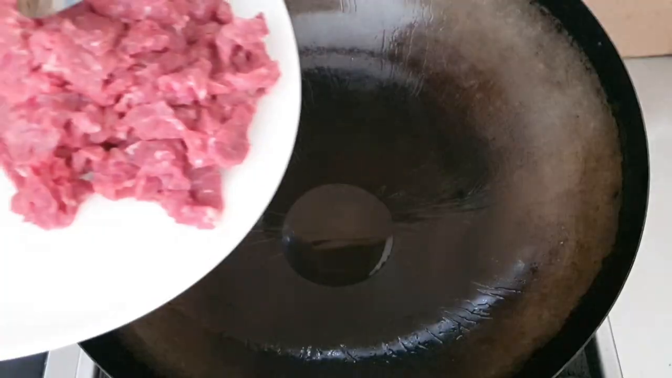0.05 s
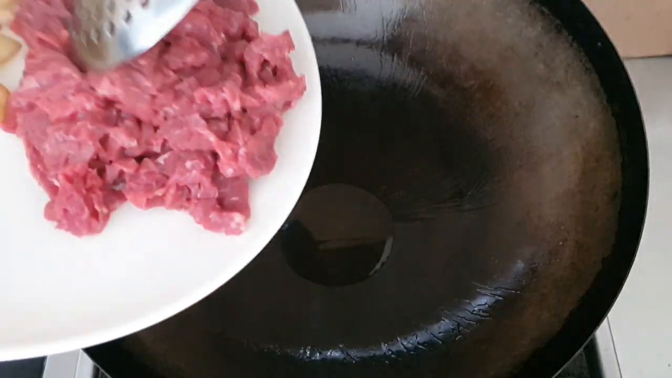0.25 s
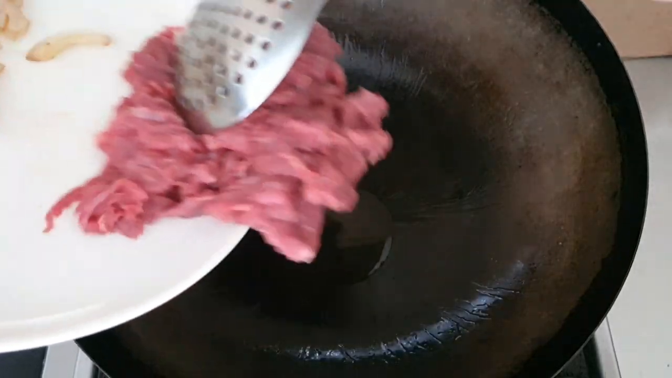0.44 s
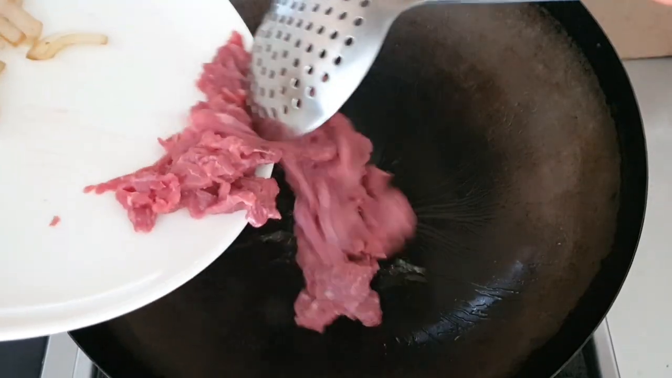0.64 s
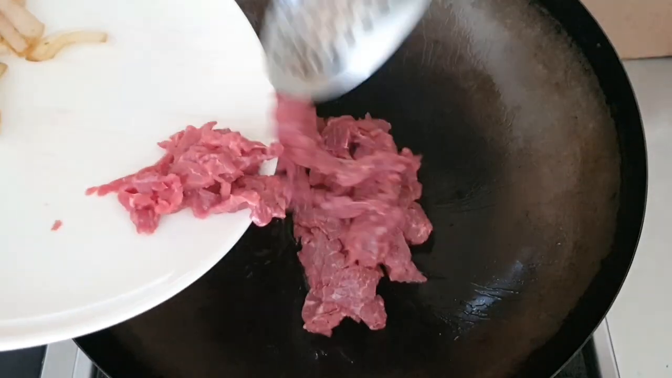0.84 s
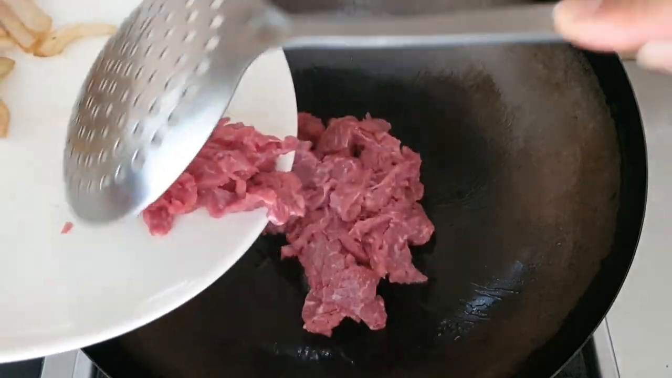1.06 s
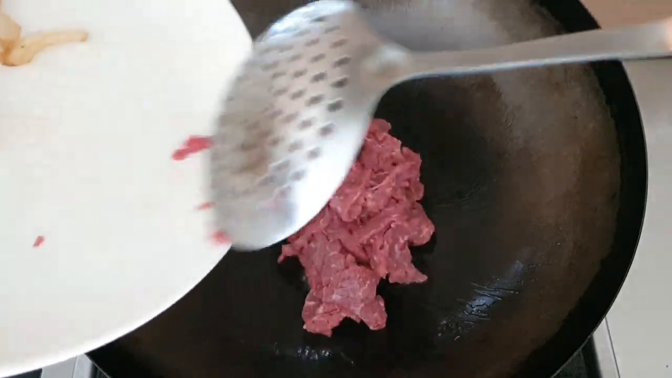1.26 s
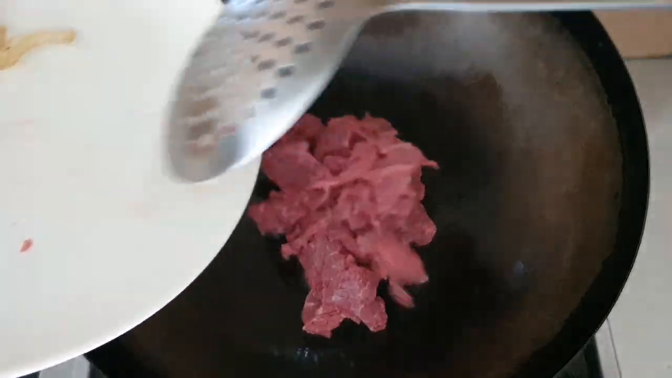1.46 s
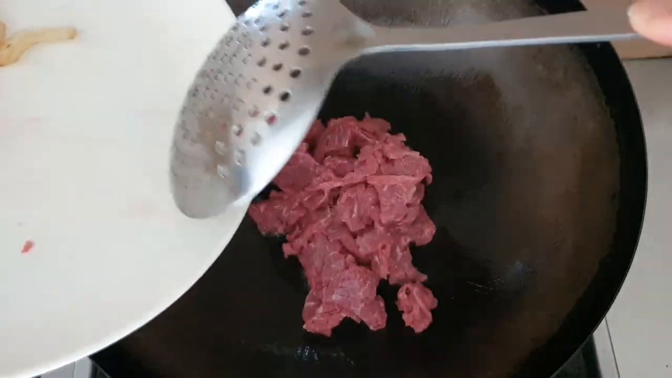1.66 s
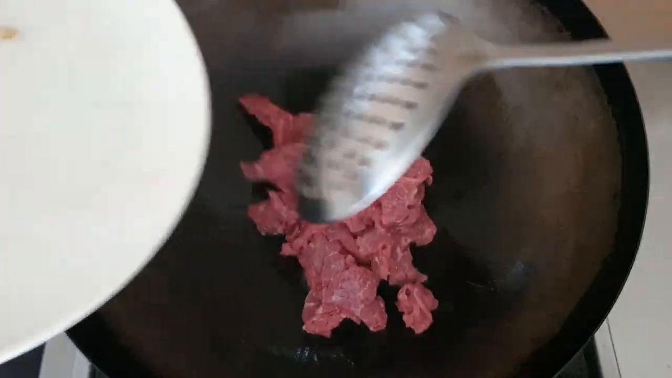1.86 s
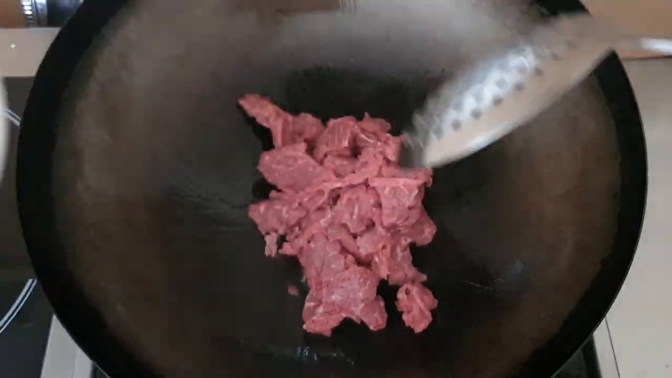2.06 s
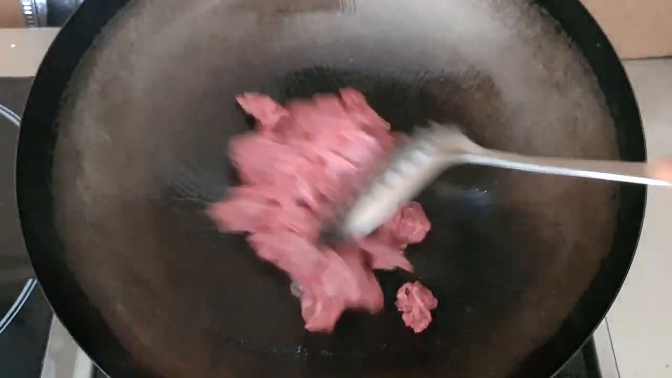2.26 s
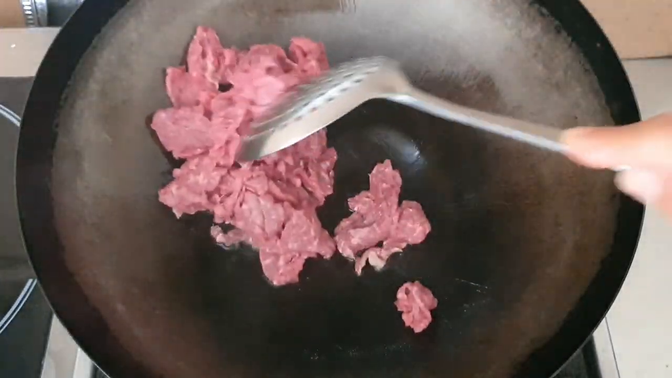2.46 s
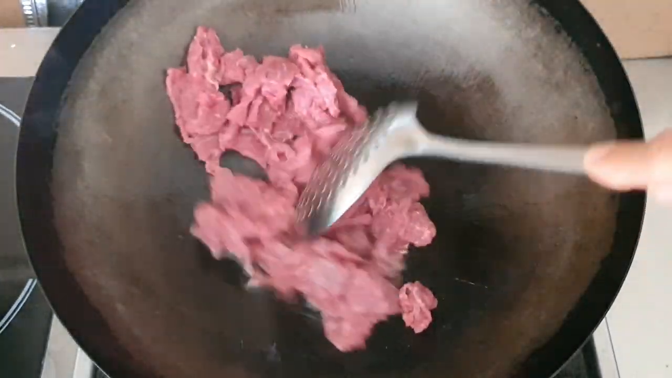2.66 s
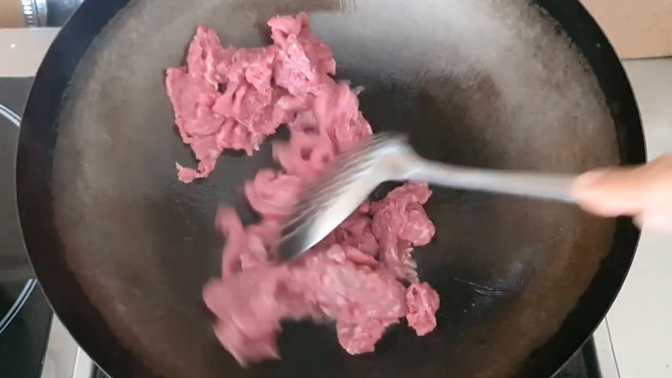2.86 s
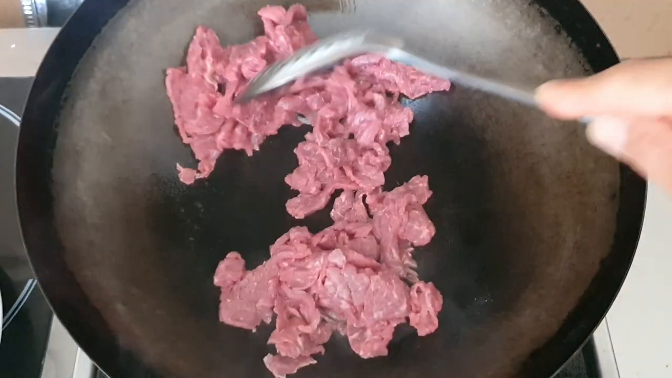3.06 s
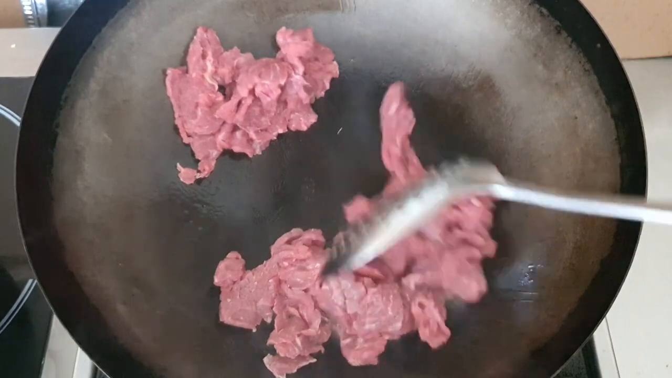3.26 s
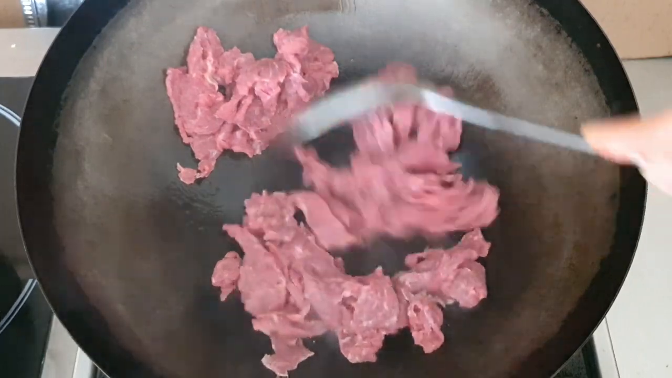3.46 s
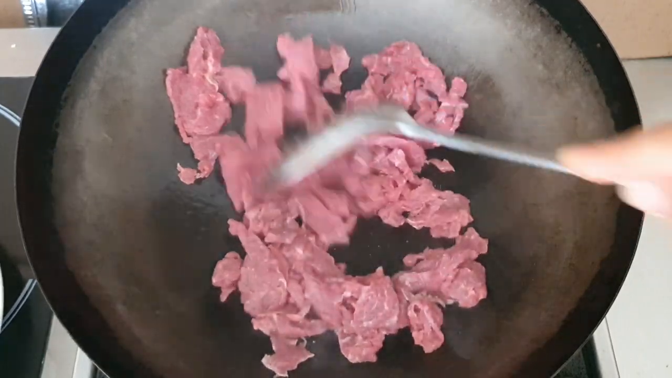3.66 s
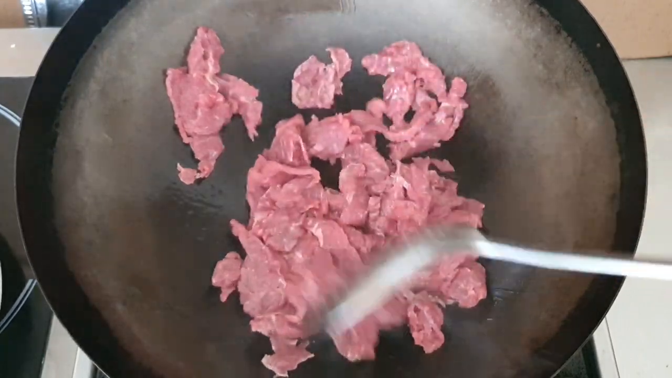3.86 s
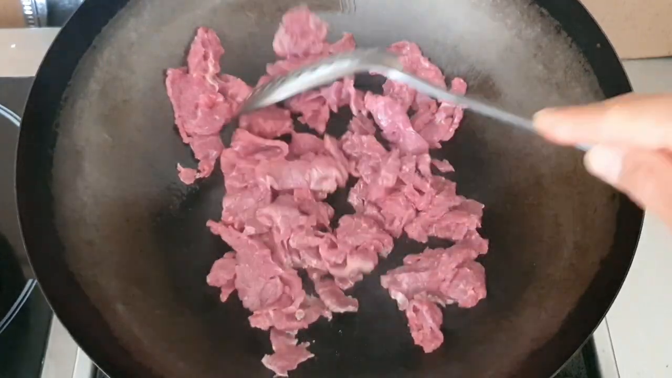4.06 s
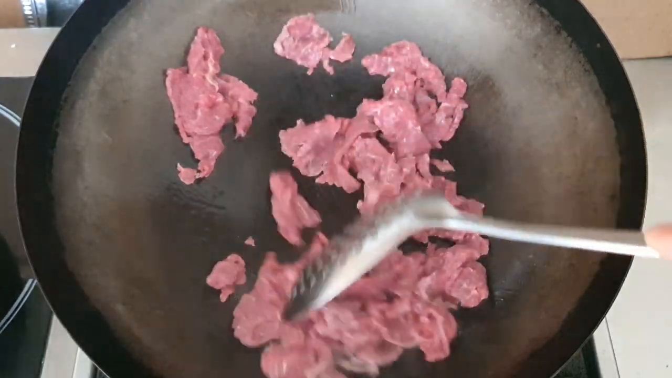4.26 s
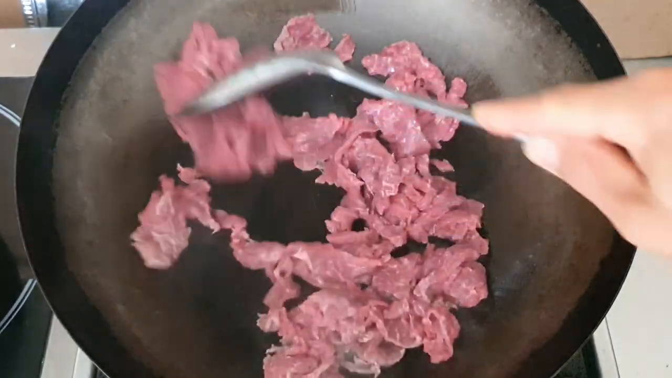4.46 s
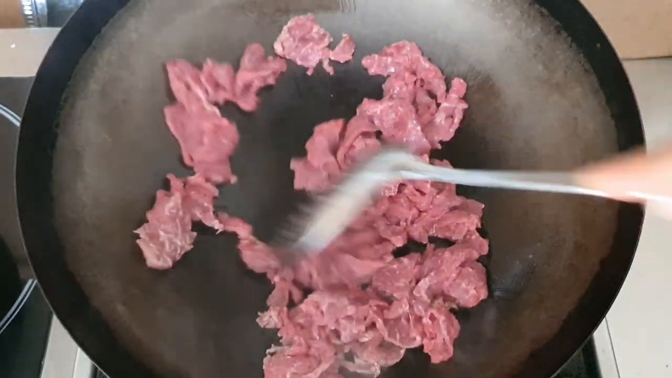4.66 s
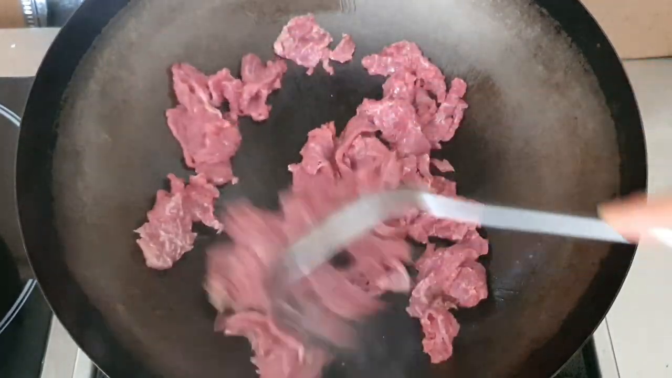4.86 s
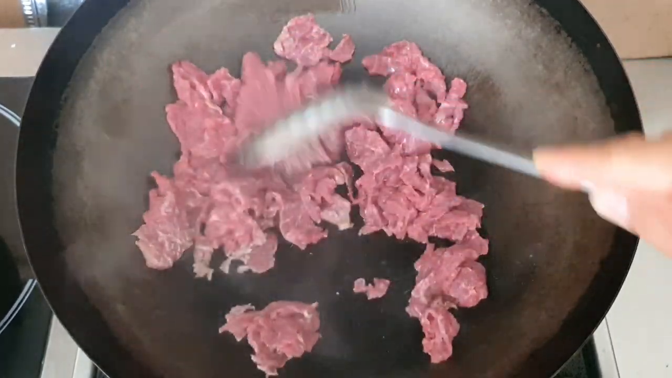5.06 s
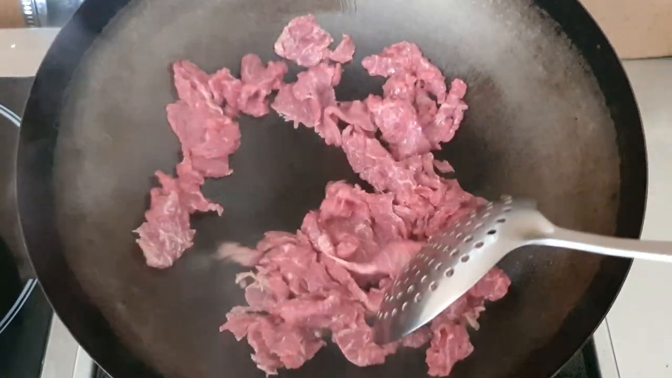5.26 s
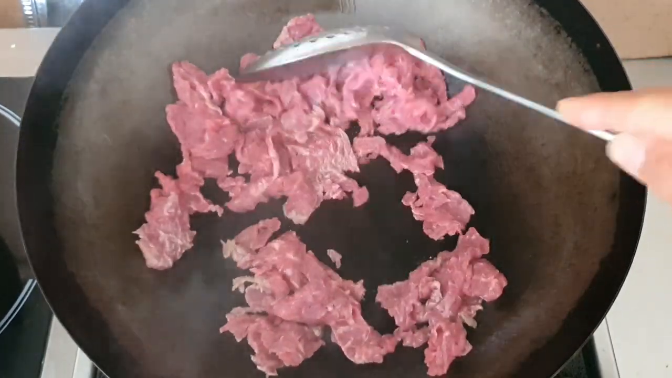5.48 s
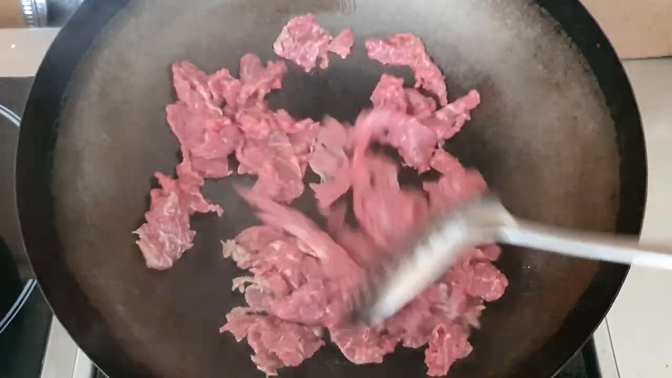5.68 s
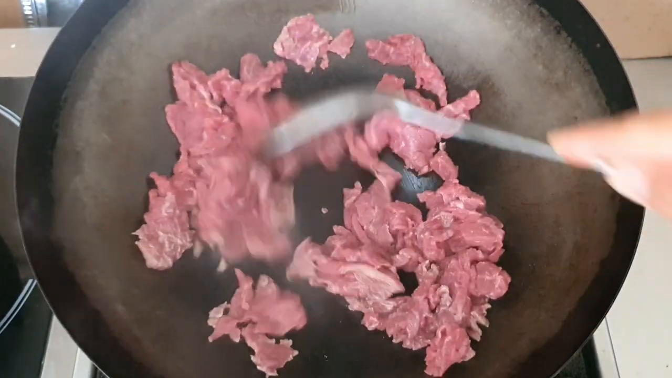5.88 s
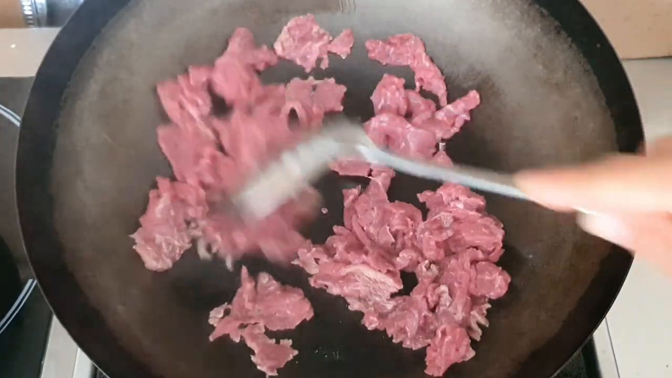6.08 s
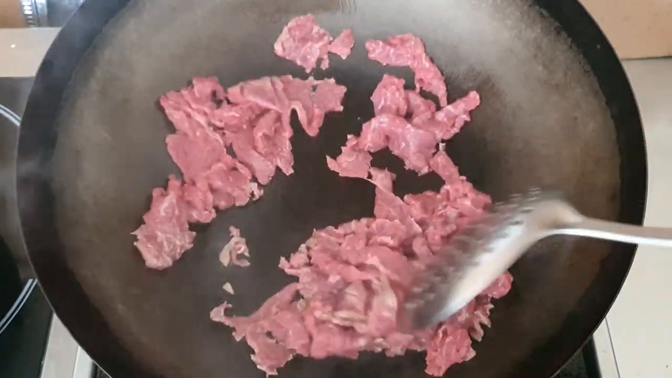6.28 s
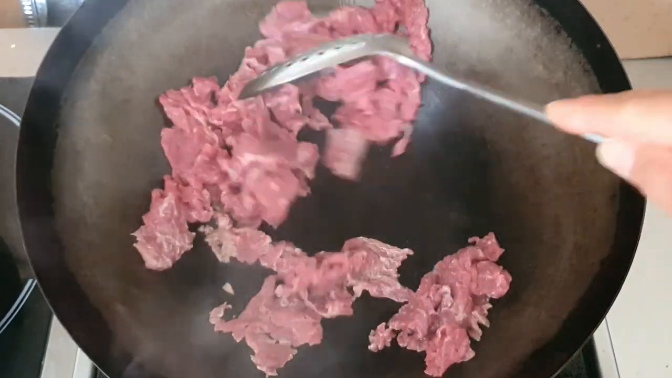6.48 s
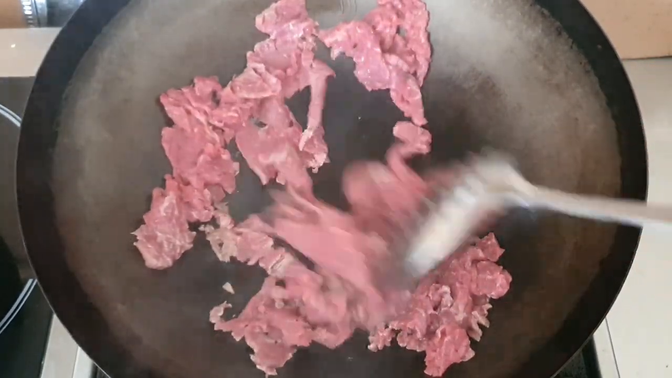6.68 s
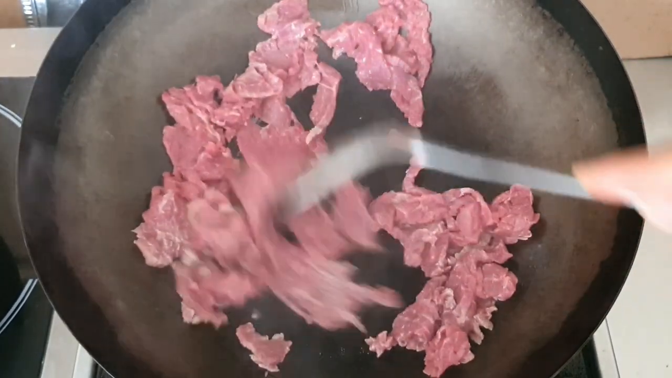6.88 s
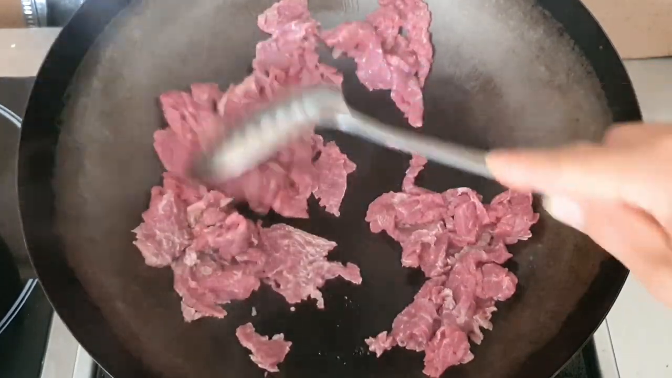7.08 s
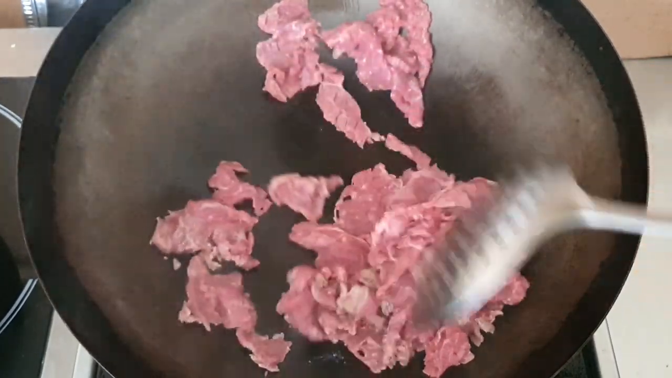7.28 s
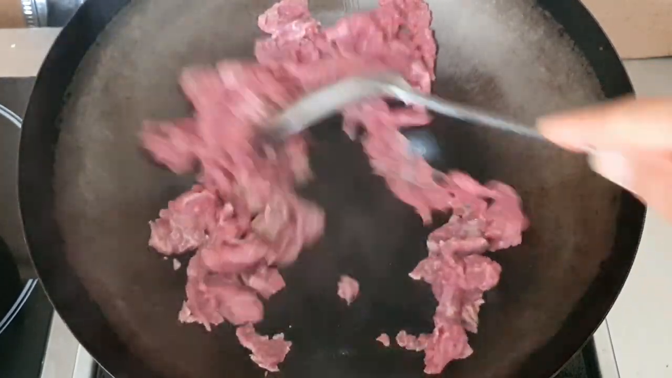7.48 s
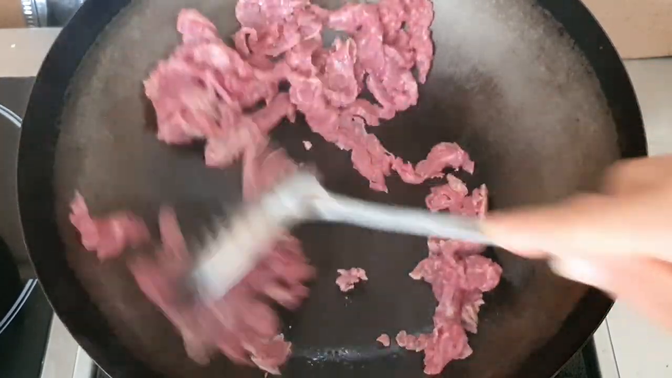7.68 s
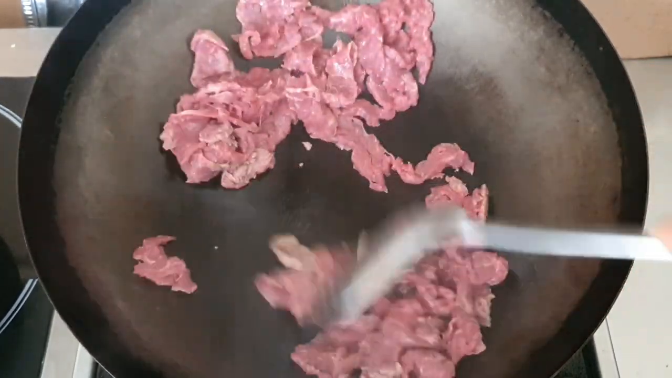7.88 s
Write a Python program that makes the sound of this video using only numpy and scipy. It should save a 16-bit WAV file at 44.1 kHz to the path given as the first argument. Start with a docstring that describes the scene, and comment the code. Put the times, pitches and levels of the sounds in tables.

```python
"""In a small kitchen, sliced meat slides off a china plate into a hot oiled wok and sizzles at once.
The sizzle is thousands of tiny random bursts, oil bubbles and spatter, flaring as meat lands or is turned.
A steel spoon taps the plate twice, then stirs: ringing modes make the plate and the iron bowl sound,
short snaps make the ticks, and low noise makes the wok rock on its stand.
A burner of coloured noise murmurs underneath; the stereo microphone is close above the pan."""
import sys
import numpy as np
from scipy import signal
from scipy.fft import rfft, irfft
from scipy.io import wavfile
from scipy.ndimage import uniform_filter1d

SR = 44100
rng = np.random.default_rng(int(sys.argv[2]) if len(sys.argv) > 2 else 0)


def dump(signal):
    """Clip the signal to [-1, 1] and save it as 16-bit WAV at the path in sys.argv[1]."""
    limited = np.clip(np.atleast_2d(signal).T, -1, 1)
    pcm = np.round(limited * 32767).astype(np.int16)
    wavfile.write(sys.argv[1], SR, pcm)


N = 349713

LANDING_S, LANDING_RISE_S = 0.742, 0.026   # the meat reaches the wok
# tone of the fine bursts: pitch_hz, level_db (per Hz)
BURST_COLOUR = [(1200, -32), (2000, -15.5), (2600, 0), (3100, 2.5), (3900, 0.5), (4900, 2.5), (7200, 0.3),
                (8300, -8), (9800, -12), (12000, -18), (17000, -39)]
# tone of the finest hiss: pitch_hz, level_db (per Hz)
STEAM_COLOUR = [(5000, -41.5), (8000, -4), (9800, -1.5), (12000, 2), (14000, 2), (15400, 2.5), (17000, -11)]
# tone of the coarse spatter, coloured by the bowl: pitch_hz, level_db (per Hz)
SPATTER_COLOUR = [(100, -32), (200, -16.5), (300, -22.5), (400, -8), (480, -12), (660, -1), (880, -9),
                  (1170, 2), (1400, -0.5), (1700, 3.5), (2200, 5.5), (3000, 3), (6000, -17.5)]
# how the sizzle leans to one side: pitch_hz, left_minus_right_db
SIZZLE_BALANCE = [(200, -2), (650, 4.5), (1300, 2), (2400, 0), (3300, -1.5), (4800, -3), (7200, -3),
                  (8200, -0.7), (9300, -0.5), (11000, -4), (13700, -2), (15400, 4.5)]


def sizzle():
    """Water flashes to steam under the meat: a haze of tiny bursts, single pops, bubbles and coarser spatter."""
    level_db, spatter_db, steam_db = frying()
    landed = np.clip((np.arange(N) / SR - LANDING_S) / LANDING_RISE_S, 0, 1) ** 2
    # more wet surface on the iron means more bursts; they come in clumps
    busy = from_db(level_db - level_db.max() + 3.2 * drift(70))

    # each patch of meat reaches the room by paths of its own
    haze = 0
    for patch in range(3):
        haze = haze + kitchen(grains(5300 * np.sqrt(busy), spread_db=3.0, channels=2), wet_db=-3)
    pops = rms_one(kitchen(grains(500 * busy, spread_db=4.2), wet_db=-3))
    fizz = bubbles(2015, 15500, ring_s=0.0038, spread_db=2.0, count=12000)
    fizz = rms_one(kitchen(fizz, wet_db=-3.5))
    crackle = rms_one(haze) + from_db(-13) * pops + from_db(-7.0) * fizz
    bursts = rms_one(coloured(crackle, BURST_COLOUR)) * from_db(-0.56 + 0.71 * drift(50))
    steam = rms_one(coloured(crackle, STEAM_COLOUR)) * from_db(steam_db + 0.45 * drift(50))

    # the longer waves of the spatter reach both ports more alike
    drops = 0
    for patch in range(3):
        drops = drops + kitchen(grains(750 * busy, spread_db=3.0), wet_db=-2.5)
    blobs = bubbles(302, 3500, ring_s=0.0036, spread_db=1.5, count=8000)
    drops = rms_one(drops) + 0.59 * rms_one(kitchen(blobs, wet_db=-0.5))
    spatter = rms_one(coloured(from_left(drops), SPATTER_COLOUR)) * from_db(spatter_db + drift(25))

    left, right = (bursts + steam + spatter) * from_db(level_db + 0.65 * drift(16)) * landed
    # each side takes half of the left-right difference
    left = coloured(left, SIZZLE_BALANCE, share=.5)
    right = coloured(right, SIZZLE_BALANCE, share=-.5)
    return np.vstack([left, right])


# frying of the heap while it lies undisturbed: start_s, level_db
HEAP = [(0.77, -26.5), (0.84, -23.5), (1.1, -25), (1.27, -26), (1.42, -31.5), (1.52, -32.5), (1.72, -29.5),
        (1.92, -32.5), (2.34, -31)]
SPREAD_S, SPREAD_TAKES_S, SPREAD_DB = 2.34, 0.089, -25.5   # the spoon spreads the heap to an even layer
# wet meat lands on or is turned onto hot iron and flares:
# start_s, length_s, extra_sizzle_db, extra_spatter_db
FLARES = [(0.754, 0.16, 1, -1), (0.976, 0.12, 1.3, 2), (2.378, 0.18, 3, 4), (2.604, 0.22, 1.4, 3),
          (2.944, .1, 1.8, 1.5), (3.173, 0.066, 1.2, 5.5), (3.354, 0.17, 2.1, 4.5), (3.82, .1, .5, 1),
          (4.022, 0.061, 2, 3.5), (4.332, 0.17, 3, 2), (4.87, 0.29, 0.5, 1), (5.32, 0.11, 2, 0.5),
          (5.534, .15, 0.9, 0.5), (5.93, 0.17, 2, -0.5), (6.415, 0.26, 1.25, .5), (6.981, 0.15, 2.2, -0.5),
          (7.24, 0.14, 1.1, 0), (7.49, 0.13, 1.5, 0.5), (7.788, 0.12, 2.1, 0.5)]
FLARE_RISE_S, FLARE_FALL_S = 0.06, 0.07
SPATTER_DB = -11.5   # relative to the sizzle, when the meat lands
DRYING_DB_PER_S = 0.13   # coarse spatter thins out as the meat sears
STEAM_DB = 1.32   # finest hiss relative to the sizzle
STEAM_ONSET_DB, STEAM_BUILDS_S = -8, 0.29   # the hiss builds up after the landing
STEAM_LOSS = 0.45   # dB less hiss for each dB of extra spatter
STEAM_COVERED = 0.077   # dB more hiss, relatively, for each dB that the heap is quieter


def frying():
    """Levels in dB of the sizzle, and of spatter and steam beside it: the heap settles, is spread, and flares."""
    t = np.arange(N) / SR
    age = np.maximum(t - LANDING_S, 0)
    heap_db, = in_time(HEAP)
    spread = np.clip((t - SPREAD_S) / SPREAD_TAKES_S, 0, 1)
    base_db = (1 - spread) * heap_db + spread * SPREAD_DB
    flare_db, spit_db = 0, 0
    for s, length, sizzle_db, spatter_db in FLARES:
        fresh = swell(s, length, FLARE_RISE_S, FLARE_FALL_S)
        flare_db = flare_db + sizzle_db * fresh
        spit_db = spit_db + spatter_db * fresh
    level_db = base_db + flare_db
    steam_db = STEAM_DB + STEAM_ONSET_DB * np.exp(-age / STEAM_BUILDS_S)
    steam_db = steam_db + STEAM_COVERED * (SPREAD_DB - level_db) - STEAM_LOSS * spit_db
    return level_db, SPATTER_DB - DRYING_DB_PER_S * age + spit_db, steam_db


# spoon taps on the plate: start_s, level_db, place (on the rim, 0-1)
TAPS = [(1.2768, -10, 0), (1.7497, -10, 1)]
# plate modes in close pairs: pitch_hz, strength_a_db, strength_b_db, t60_s (time to fade by 60 dB)
# a counts 1.5 times at place 0 and half at place 1; b counts only away from place 0
PLATE_MODES = [(1464, -13, -35, .27), (1486, -16, -35, .24), (2050, -24, -15, .2), (2379, -8, -7, .28),
               (2417, -8, -11, .27), (3480, -10, -8, .2), (3531, -2, -7, .27), (3682, -18, -12, .19),
               (4834, -9, -6, .23), (4865, -13, -11, .2), (6340, -12, -15, .19), (6440, -9, -12, .19),
               (8250, -22, -11, .11)]
# tone of the plate's clack: pitch_hz, level_db (per Hz)
CLACK_COLOUR = [(80, -52), (200, -25), (400, -9.5), (700, -2), (1150, -3), (1750, -17), (2300, 7.5),
                (3000, 3), (3700, 7), (4500, -15), (9000, -22)]
CLACK_DB, CLACK_S = -2.5, 0.012   # clack of the hand-held plate: level relative to the tap, decay time


def plate():
    """Paired modes beat as they die, over a short clack; the place of the tap sets their strengths."""
    s, level_db, place = np.transpose(TAPS)
    rings = 0
    for k, (hz, a_db, b_db, t60) in enumerate(PLATE_MODES):
        strength = from_db(level_db + (1.5 - place) * a_db + place * b_db)
        rings = rings + (-1) ** k * ring(blows(s, strength), hz, t60)
    noise = rng.standard_normal((2, N)) + rng.standard_normal(N)   # partly shared by both sides
    body = rms_one(coloured(noise, CLACK_COLOUR))
    clack = body * sum(from_db(db + CLACK_DB) * swell(at, 0, .0005, CLACK_S) for at, db, _ in TAPS)
    return kitchen(rings, wet_db=-13) + kitchen(clack, wet_db=-7)


# spoon ticks and squelches, damped by the meat: start_s, level_db, pitch_hz (centre)
TICKS = [(.417, -45, 5000), (.46, -45, 7000), (.555, -46, 8000), (.65, -47, 6000), (.671, -47, 9000),
         (.757, -16, 3500), (1.036, -23, 1800), (1.197, -11, 4500), (1.9855, -16, 3500), (2.114, -41, 400),
         (2.1525, -15, 7000), (1.2768, -6, 4000), (1.7497, -5, 3500), (2.1645, -6, 3800),
         (2.369, -16, 3500), (3.016, -18, 2000), (3.611, -17, 2200), (4.381, -20, 1200), (5.0, -31, 700),
         (5.897, -28, 700)]


def ticks():
    """Each contact is one sharp snap with a few milliseconds of grit behind it."""
    out, t = np.zeros(N), np.arange(SR // 20) / SR
    for s, level_db, hz in TICKS:
        edges = [hz / 1.9, min(hz * 1.7, SR / 2.5)]
        band = signal.butter(1, edges, "band", fs=SR, output="sos")
        snap = 1.6 * signal.sosfilt(band, np.sin(2 * np.pi * hz * t) * np.exp(-hz * t))
        grit = rms_one(signal.sosfilt(band, rng.standard_normal(len(t))))
        grit *= .25 * np.exp(-t / .0014) + .08 * np.exp(-t / .013)
        at = round(s * SR)
        out[at:at + len(t)] += from_db(level_db) * (snap + grit)
    return kitchen(out, wet_db=-7)


# wok modes: pitch_hz, level_db, t60_s (time to fade by 60 dB)
WOK_MODES = [(66.4, -33, 0.28), (125, -12, 0.13), (157, -9, .09), (190, 2.5, 0.15), (203.5, 0.5, 0.058),
             (251.5, 2, 0.11), (386, -9, 0.11), (474, -3.5, 0.036), (526.5, -6, 0.16), (683, -13, 0.034),
             (728, -4, 0.041), (923, -3, 0.038), (1020, -5, 0.074), (1340, -24, .03)]


def bowl(clicks):
    """The iron bowl radiates by its velocity, so a slow push makes no sound."""
    out = 0
    for hz, db, t60 in WOK_MODES:
        velocity = np.diff(ring(clicks, hz, t60), prepend=0) * SR / (2 * np.pi * hz)
        out = out + velocity * from_db(db)
    return out


# strokes of the spoon dragging over the iron: start_s, length_s, level_db (judder at the stroke's end)
STROKES = [(3.196, 0.021, -22), (3.423, 0.21, -37), (3.685, 0.24, -31), (3.96, .03, -36),
           (4.044, 0.12, -48), (4.48, .035, -28.5), (4.642, 0.033, -46.5)]
STROKE_RISE_S, STROKE_FALL_S, PRESS_DB_PER_S = 0.01, 0.046, 20   # the hand presses harder along a stroke
# hard catches of the spoon on the wok: start_s, level_db
CATCHES = [(3.2048, -24), (3.2092, -24.5), (3.223, -41), (3.548, -44.5), (3.702, -36), (3.765, -42.5),
           (3.825, -33), (3.882, -30), (3.891, -47), (3.921, -30.5), (3.963, -34.5), (4.478, -39.5),
           (4.51, -37)]
# wok sound above WIDE_HZ repeats a little later, in opposite sense left and right, which widens it
WIDE_LAG_S, WIDE_HZ, WIDE_DB = 0.00338, 347, -1.5


def wok():
    """The spoon sticks and slips; each slip and each hard catch rings the loaded iron bowl."""
    t = np.arange(N) / SR
    pressure = 0
    for s, length, db in STROKES:
        press_db = db + PRESS_DB_PER_S * np.minimum(t - s - length, 0)
        pressure = pressure + from_db(press_db) * swell(s, length, STROKE_RISE_S, STROKE_FALL_S)
    judder = rms_one(bowl(grains(400, spread_db=1.0)[0])) * pressure
    s, level_db = np.transpose(CATCHES)
    catches = bowl(blows(s, from_db(level_db)))
    # meat softens the contact
    cushioned = signal.sosfilt(signal.butter(3, 1500, fs=SR, output="sos"), judder + catches)
    high = signal.sosfilt(signal.butter(2, WIDE_HZ, "high", fs=SR, output="sos"), cushioned)
    widening = from_db(WIDE_DB) * np.interp(t - WIDE_LAG_S, t, high) * np.array([[1], [-1]])
    return kitchen(cushioned + widening, wet_db=-14) * from_db([[1], [-1]])   # left 2 dB above right


# shoves that rock the wok on its stand: start_s, length_s, level_db
SHOVES = [(0.763, 0.15, -49), (1.038, 0.064, -57), (1.62, .12, -64), (3.026, 0.11, -42), (3.19, .07, -40.5),
          (3.33, 0.27, -48), (3.68, .06, -61), (3.84, 0.065, -47), (4.023, 0.09, -47.5), (4.32, 0.037, -56),
          (4.488, 0.069, -36), (4.62, 0.039, -50.5), (4.99, 0.047, -43.5), (5.3, .04, -55.5),
          (5.764, .14, -64), (6.476, 0.053, -53), (6.647, .04, -58), (7.5, 0.039, -40.5),
          (7.71, 0.049, -51)]
# tone of the rocking: pitch_hz, level_db (per Hz)
ROCK_COLOUR = [(20, -8), (45, -17), (63, 8), (80, -10), (110, -14), (170, -29), (400, -37)]
ROCK_RISE_S, ROCK_FALL_S = 0.019, 0.044
TREMBLE_DB = -66.5   # the stirred wok is never quite still


def stand():
    """Falling meat and the push of the spoon rock the heavy wok: a low, soft boom."""
    push = sum(from_db(db) * swell(s, length, ROCK_RISE_S, ROCK_FALL_S) for s, length, db in SHOVES)
    stirred = np.clip((np.arange(N) / SR - SPREAD_S) / SPREAD_TAKES_S, 0, 1)
    push = np.hypot(push, from_db(TREMBLE_DB) * stirred)
    boom = coloured(rng.standard_normal(N), ROCK_COLOUR)[0]
    # level out the noise so that only the push shapes its loudness
    even = boom / np.sqrt(uniform_filter1d(boom ** 2, size=4000) + 1e-12)
    return even * push * from_db([[.7], [-.7]])


# level of the sliding meat, including a fade-in over the first quarter second: start_s, level_db
SLIDING_LEVEL = [(0, -97), (.14, -83), (.21, -69), (.26, -64), (.36, -69), (.39, -57.5), (.47, -60),
                 (.5, -63), (.61, -63), (.645, -58), (.74, -57)]
# tone of the sliding: pitch_hz, level_db (per Hz)
SLIDE_COLOUR = [(300, -3), (900, -6), (1900, 1), (2200, 9.5), (2500, 2), (4000, 3.5), (7000, 5), (9000, 0),
                (16000, 2.5)]


def sliding_meat():
    """Tiny wet snaps, mixed with noise, as the slices peel from the china."""
    level_db, = in_time(SLIDING_LEVEL)
    snaps = rms_one(grains(5000, spread_db=5.0)) + rng.standard_normal((2, N))
    return from_db(level_db) * rms_one(coloured(snaps, SLIDE_COLOUR))


# level of the burner, including a fade-in over the first quarter second: start_s, level_db
BURNER_LEVEL = [(0, -66), (.13, -66.5), (.24, -57.5), (.75, -63), (7.93, -73)]
# tone of the burner: pitch_hz, level_db (per Hz)
BURNER_COLOUR = [(25, 15.5), (65, -7), (110, -4), (170, -25), (260, -6), (350, -4), (470, -19), (700, -14),
                 (900, -23), (2200, -15.5), (8000, -28), (16000, -40)]


def burner():
    """Soft rush of the flame: coloured noise, mostly shared by both sides."""
    level_db, = in_time(BURNER_LEVEL)
    rush = rng.standard_normal(N) + .5 * rng.standard_normal((2, N))
    return from_db(level_db) * rms_one(coloured(rush, BURNER_COLOUR))


KITCHEN_T60_S = 0.34   # time for the room's tail to fade by 60 dB


def kitchen(x, wet_db):
    """Direct sound plus a short diffuse tail from hob, hood and walls, unlike at each port."""
    t = np.arange(SR // 2) / SR
    tail = rng.standard_normal((2, len(t))) * from_db(-60 * t / KITCHEN_T60_S) * (t > .002)
    tail /= np.sqrt(np.sum(tail ** 2, axis=1, keepdims=True))
    return x + from_db(wet_db) * convolve(x, tail)


PORT_LAG_S = .00007   # the microphone's left port is nearer to the pan


def from_left(x):
    """The right port hears it a little later."""
    return np.vstack([x[0], np.interp(np.arange(N) - PORT_LAG_S * SR, np.arange(N), x[1])])


def bubbles(low_hz, high_hz, ring_s, spread_db, count, size=700):
    """Oil bubbles burst at random places, each ringing briefly at a pitch of its own."""
    when, pitch, side, bulk = rng.random((count, 4, 1)).transpose(1, 0, 2)
    t = np.arange(size) / SR
    height = from_db(spread_db * np.minimum(-np.log(1 - bulk), 4))   # many small, a few large
    hz = low_hz + pitch * (high_hz - low_hz)
    pings = height * np.sin(2 * np.pi * hz * t) * np.exp(-t / ring_s)
    at = ((when * (N - size)).astype(int) + np.arange(size)).ravel()
    ports = [np.bincount(at, (pings * port(np.pi * side)).ravel(), N) for port in (np.cos, np.sin)]
    return rms_one(np.array(ports))


def grains(per_s, spread_db, channels=1):
    """Clicks at random moments: many small, a few large, of either sign."""
    shape = (channels, N)
    sizes = from_db(spread_db * np.minimum(rng.exponential(1, shape), 4))
    return (rng.random(shape) < per_s / SR) * sizes * rng.choice([-1, 1], shape)


def blows(times, gains):
    """One click for each blow."""
    out = np.zeros(N)
    out[np.round(np.asarray(times) * SR).astype(int)] = gains
    return out


def ring(clicks, hz, t60):
    """A unit click sets a sine ringing from height 1, fading by 60 dB in t60 seconds."""
    r, w = from_db(-60 / (t60 * SR)), 2 * np.pi * hz / SR
    return signal.lfilter([0, np.sin(w)], [1, -2 * r * np.cos(w), r * r], clicks + 1e-18)


def swell(start, length, rise_s, fall_s):
    """Envelope of one gesture: it rises, holds until its length is over, then dies away."""
    t = np.arange(N) / SR - start
    return np.clip(t / rise_s, 0, 1) * np.exp(-np.clip((t - length) / fall_s, 0, 20))


def drift(rate):
    """Slow chance with a spread near 1, from random points joined by lines, rate points a second."""
    steps = np.arange(N) / SR * rate
    return np.interp(steps, np.arange(N), rng.standard_normal(N))


def coloured(x, points, share=1, size=8192):
    """Causal (minimum-phase) filter that follows a share of a (Hz, dB) spectrum."""
    hz, db = np.transpose(points)
    bins = np.maximum(np.fft.rfftfreq(size, 1 / SR), 1)
    cepstrum = irfft(np.log(from_db(share * np.interp(np.log(bins), np.log(hz), db))))
    # folding the cepstrum forward makes the filter respond as early as it can
    cepstrum[1:size // 2] *= 2
    cepstrum[size // 2 + 1:] = 0
    return convolve(x, irfft(np.exp(rfft(cepstrum))))


def convolve(x, response):
    """Pass a sound through a response, channel by channel."""
    return signal.oaconvolve(np.atleast_2d(x), np.atleast_2d(response), axes=1)[:, :N]


def in_time(rows):
    """Each column of a curve at every sample."""
    s, *columns = np.transpose(rows)
    return [np.interp(np.arange(N) / SR, s, c) for c in columns]


def rms_one(x):
    """Scale so that the average of the channels has rms 1."""
    return x / np.sqrt(np.mean(np.atleast_2d(x).mean(axis=0) ** 2) + 1e-20)


def from_db(db):
    """Decibels to gain."""
    return 10 ** (np.asarray(db) / 20)


def scene():
    """Everything at the hob, in stereo."""
    return sizzle() + sliding_meat() + plate() + ticks() + from_left(wok() + stand()) + burner()


LIMIT_DB, LIMIT_RELEASE_DB_PER_S = -14.5, 28


def limiter(x):
    """The gain ducks within milliseconds under a loud blow and creeps back."""
    power = signal.lfilter([1 / 130], [1, 1 / 130 - 1], np.mean(x ** 2, axis=0))   # smoothed over 3 ms
    over_db = np.maximum(10 * np.log10(power + 1e-12) - LIMIT_DB, 0)
    creep_db = LIMIT_RELEASE_DB_PER_S * np.arange(N) / SR
    return x * from_db(creep_db - np.maximum.accumulate(over_db + creep_db))


LOW_CUT_HZ, CUTOFF_HZ = 33, 15600


def record(dry):
    """Deep bass is cut, loud blows duck the gain, the highest peaks are rounded, and the very top is cut."""
    ports = limiter(signal.sosfilt(signal.butter(2, LOW_CUT_HZ, "high", fs=SR, output="sos"), dry))
    rounded = ports / (1 + (ports / .85) ** 4) ** .25
    return signal.sosfilt(signal.ellip(12, .1, 90, CUTOFF_HZ, fs=SR, output="sos"), rounded)


dry = scene()
out = record(dry)
dump(out)
```